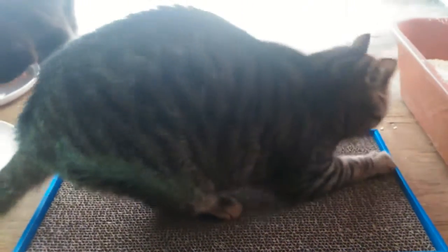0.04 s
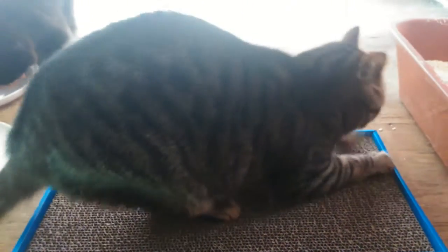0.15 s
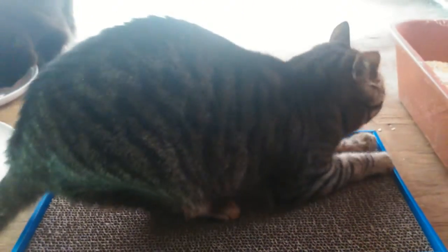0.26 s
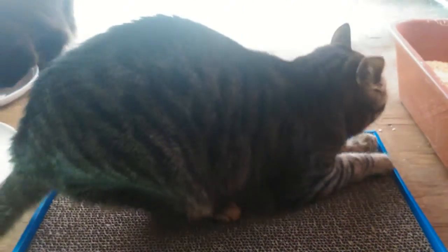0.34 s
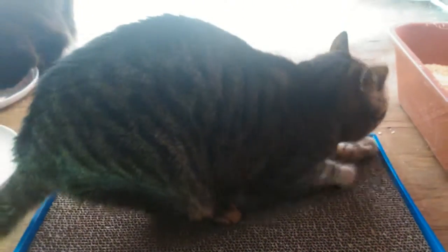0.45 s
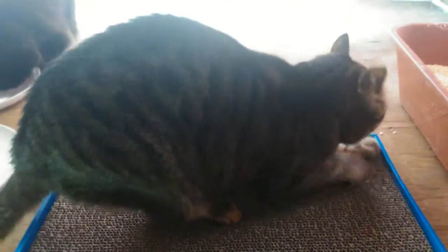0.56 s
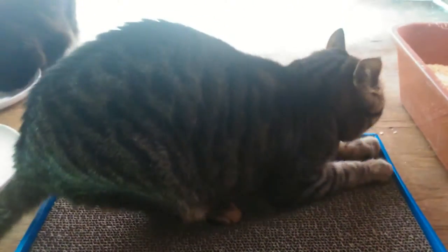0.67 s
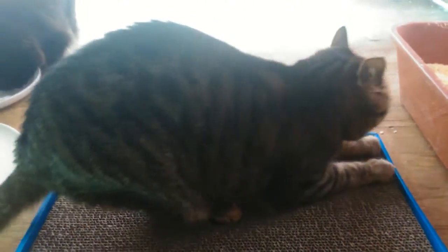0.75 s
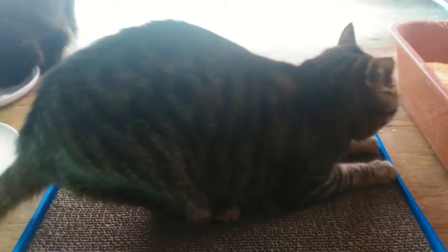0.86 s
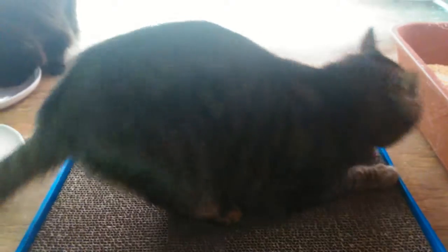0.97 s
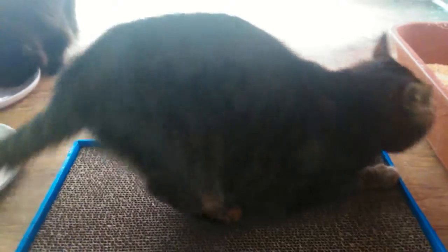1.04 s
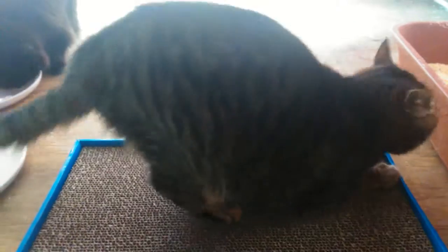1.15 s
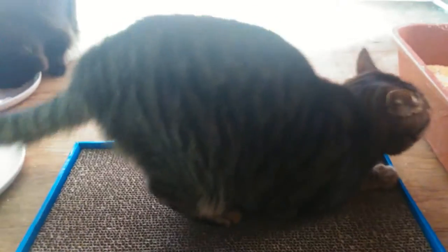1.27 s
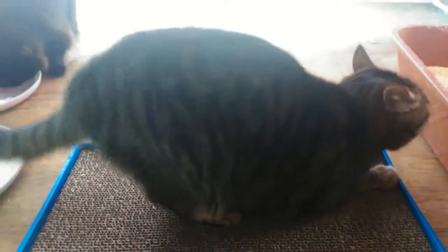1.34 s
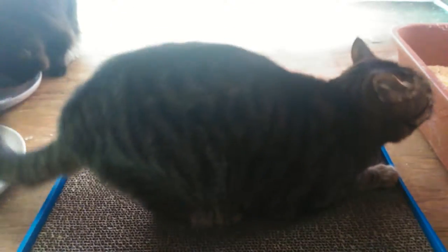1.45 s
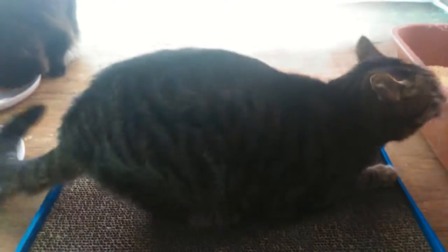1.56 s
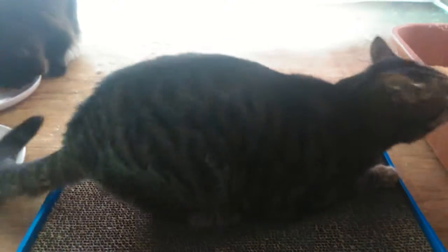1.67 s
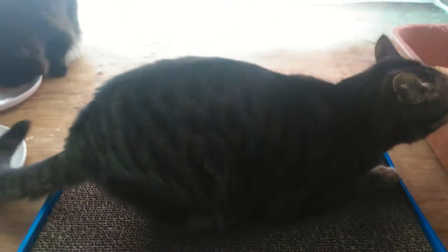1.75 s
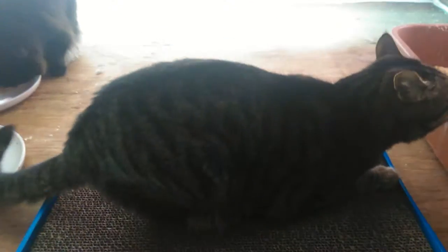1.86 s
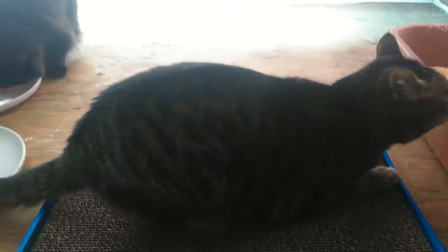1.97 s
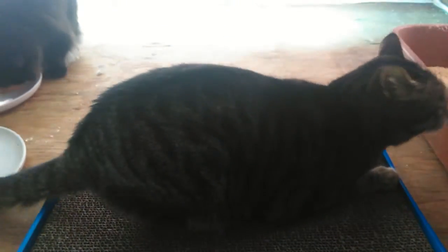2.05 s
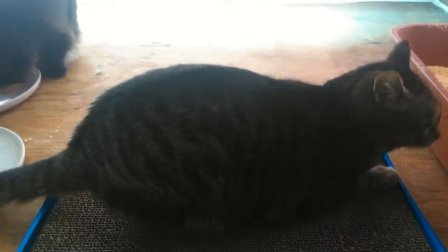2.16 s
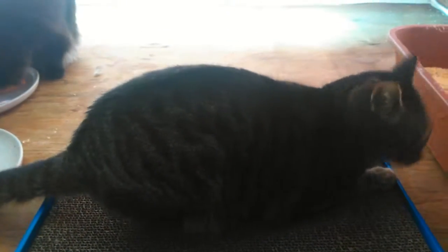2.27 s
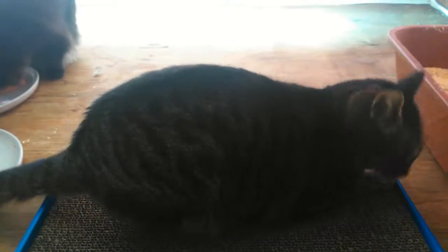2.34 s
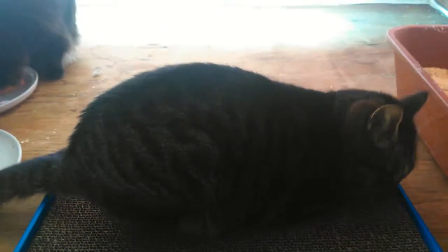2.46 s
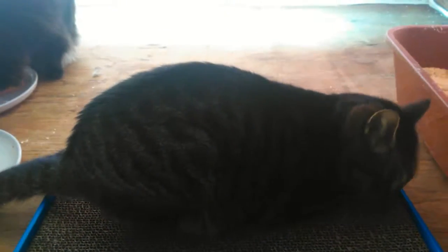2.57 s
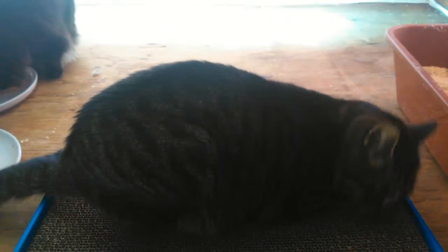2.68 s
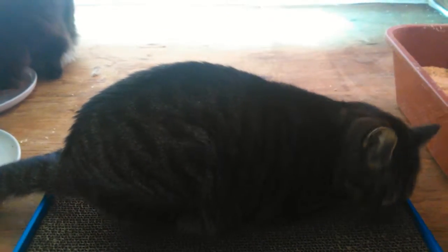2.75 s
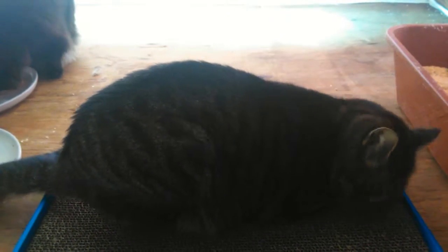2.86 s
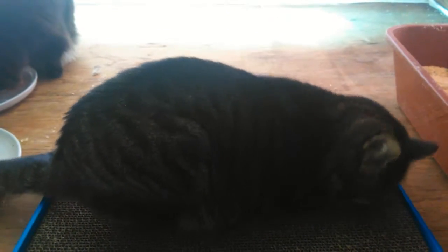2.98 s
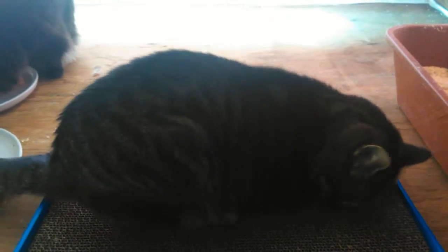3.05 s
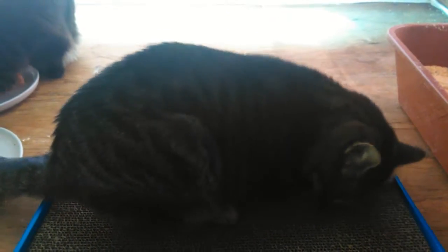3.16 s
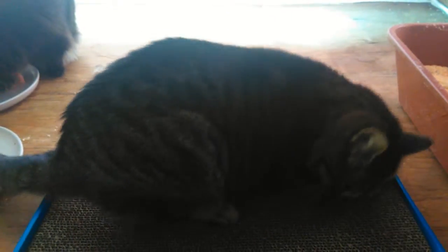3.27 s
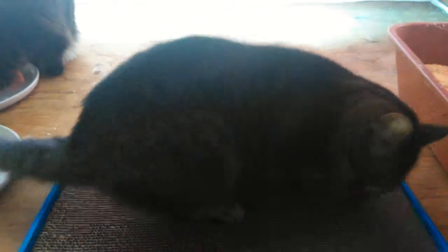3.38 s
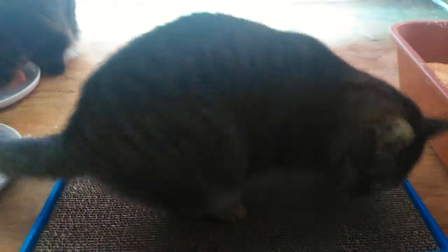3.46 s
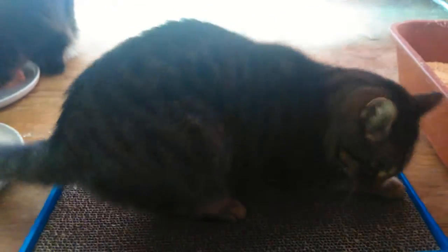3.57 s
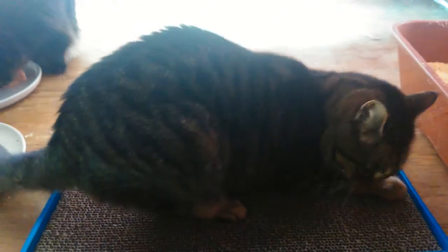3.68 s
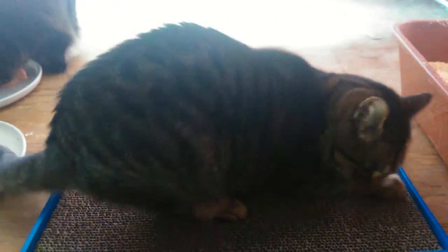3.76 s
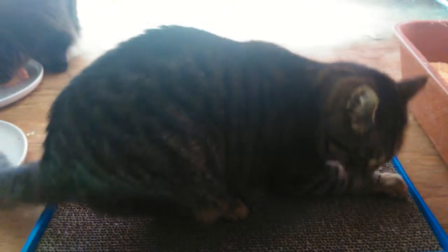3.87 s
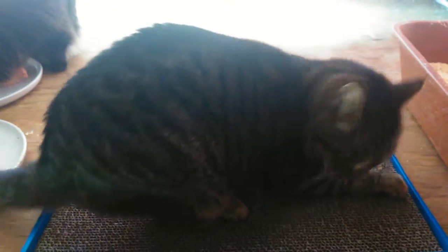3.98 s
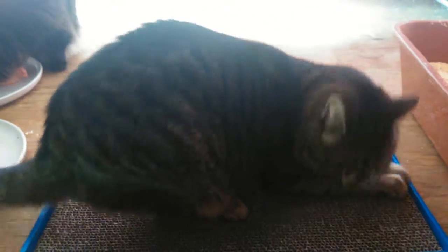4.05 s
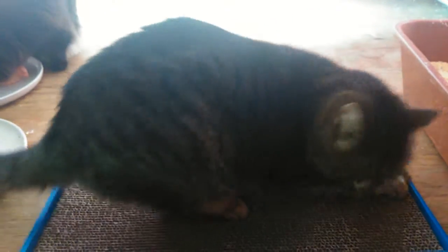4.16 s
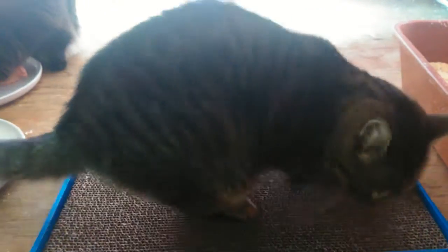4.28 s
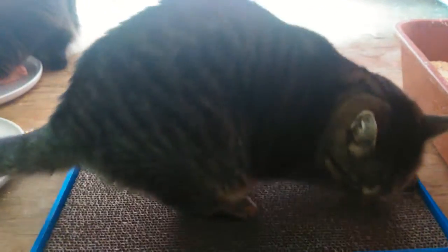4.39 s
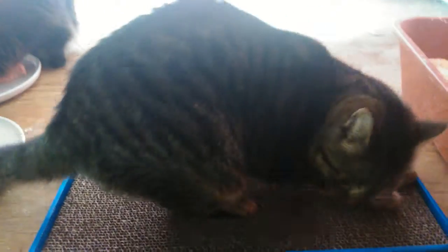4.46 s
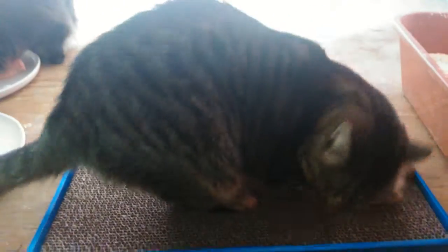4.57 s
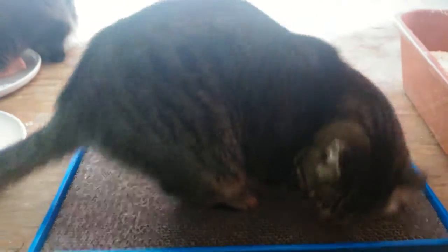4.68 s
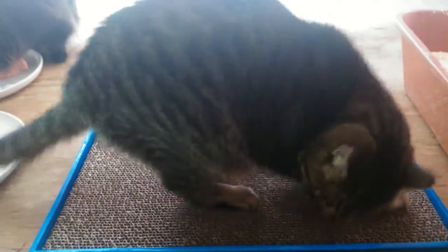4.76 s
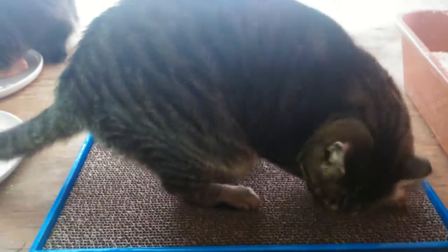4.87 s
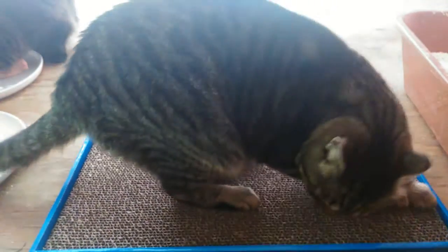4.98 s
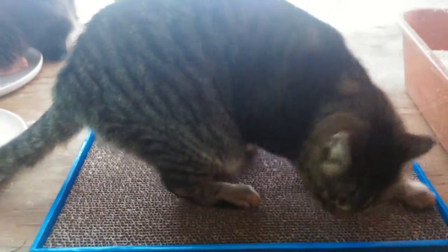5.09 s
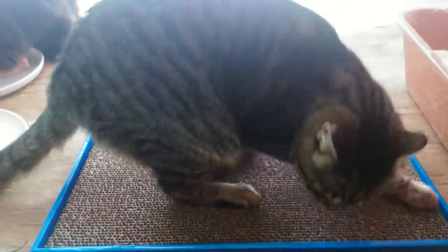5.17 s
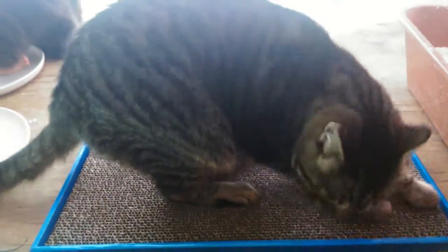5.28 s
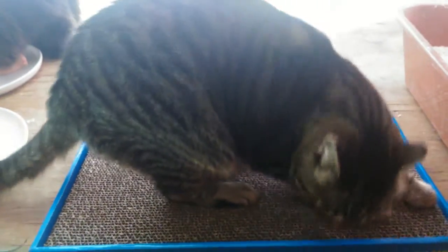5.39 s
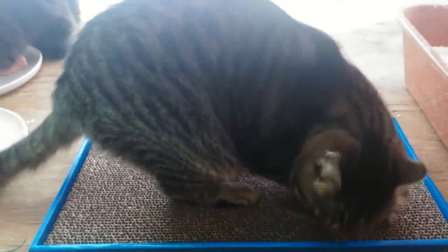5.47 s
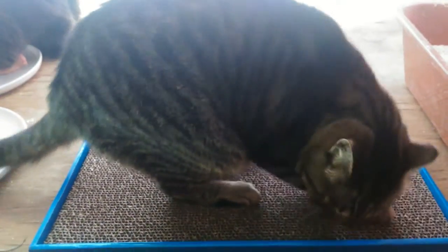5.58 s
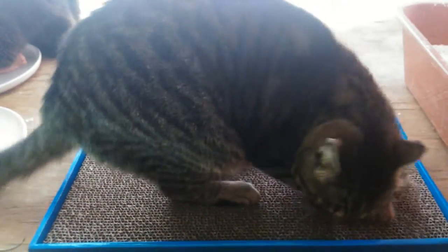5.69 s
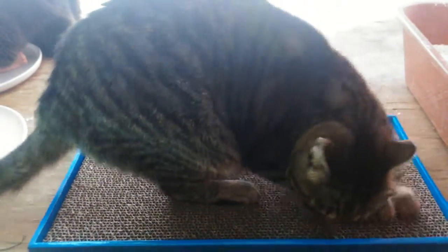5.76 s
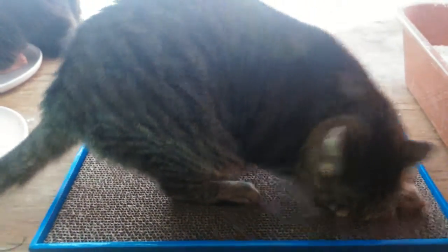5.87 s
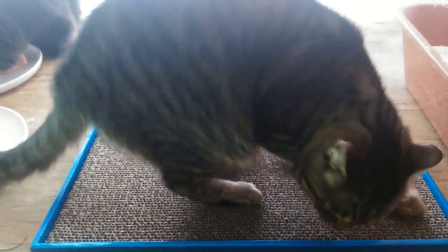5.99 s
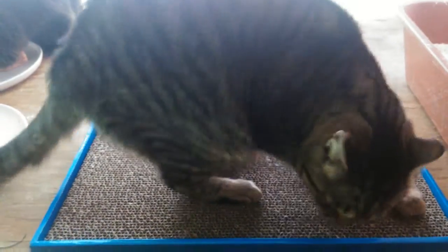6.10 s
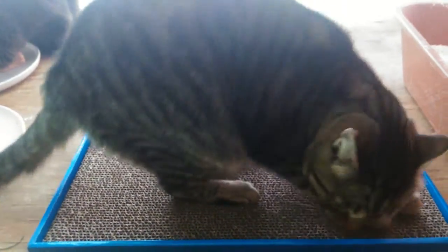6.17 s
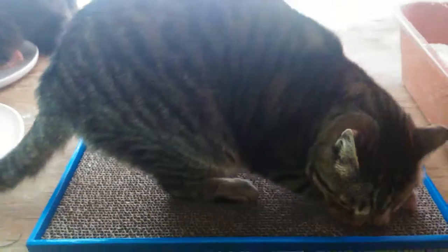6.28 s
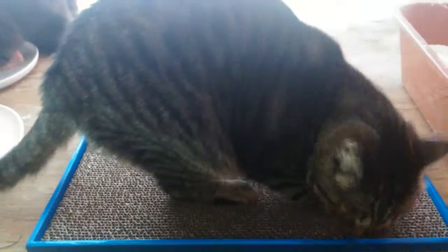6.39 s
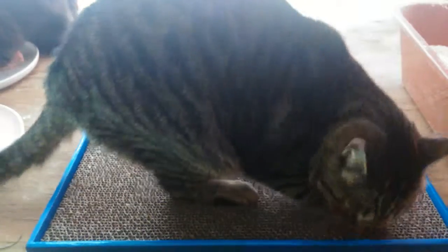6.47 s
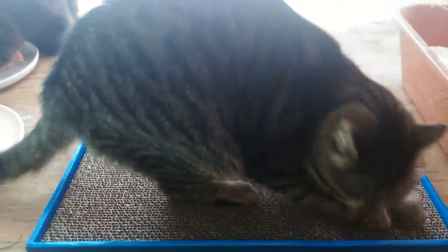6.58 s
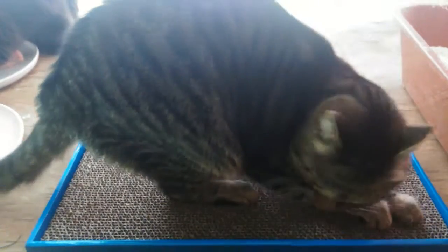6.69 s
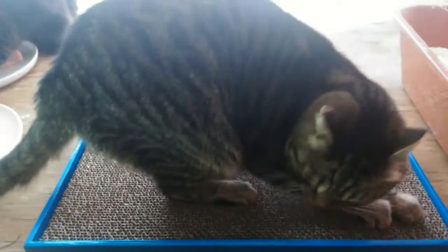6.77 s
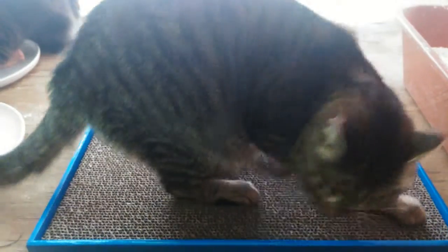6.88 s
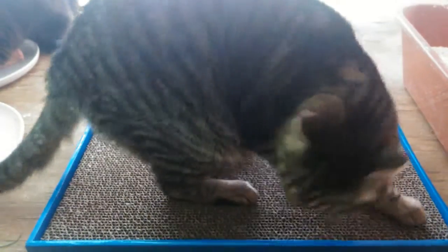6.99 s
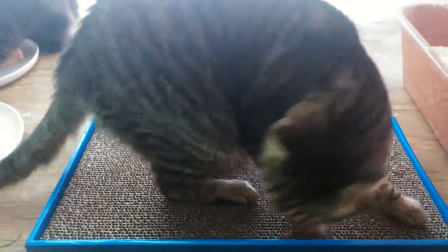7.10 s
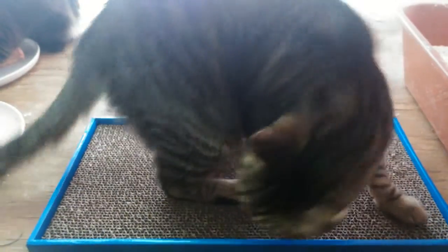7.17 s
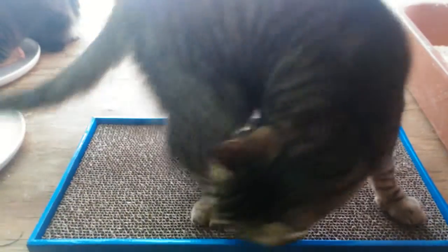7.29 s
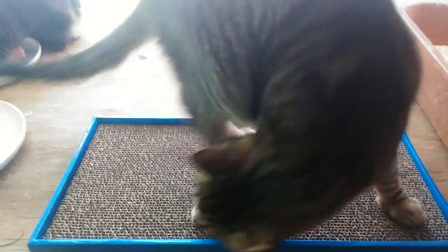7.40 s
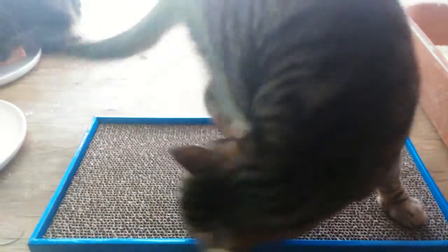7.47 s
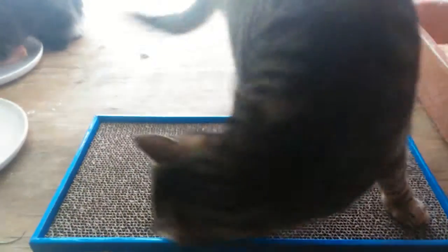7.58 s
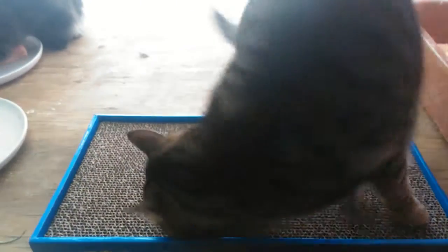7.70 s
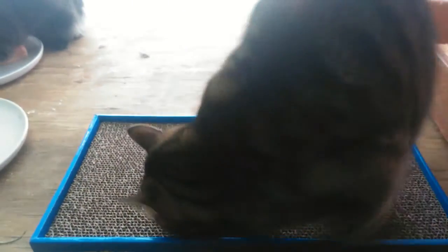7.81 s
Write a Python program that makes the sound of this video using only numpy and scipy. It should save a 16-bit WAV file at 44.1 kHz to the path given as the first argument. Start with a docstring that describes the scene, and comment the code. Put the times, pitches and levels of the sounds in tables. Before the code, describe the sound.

At 0 s a loud claw snag rips corrugated cardboard right beside the microphone, with a deep thud in the floor planks. Irregular scratches follow several times a second until about 1.25 s: crisp fibre tearing, hollow flute-like scraping, small ticks and dull pad knocks. From 1.3 to 2.9 s it is nearly silent, with soft hiss, faint purring flutters around 1.5-1.9, 2.1-2.3, 2.4-2.7 and 2.8-2.9 s, light airy sniffs from 2 s, and barely audible shifts of weight. Clawing resumes at 3 s and thickens into rapid, forceful rasps, densest at 4.2-5.2 s, with strong rips at 5.5, 6.0, 6.4 and 6.9 s. Low booms near 60-70 Hz sag under the heavy pulls. A tiny hard object buzzes at 5.2, 6.0, 6.2 and 7.25 s. Scratching thins after 7.1 s, nearly stops around 7.4, then weaker scrapes return from 7.6 to the end. The small room adds a brief, dry reflection.

```python
"""Cat clawing a cardboard pad

A cat claws corrugated cardboard on a plank floor, close to a two-port microphone in a small room.
Timed snags drive noise through the tearing fibres, claw tips, flutes and pad; sine plucks twang and tick.
Pitch-sagging sines boom in the planks under each pull; in a pause pulsed noise purrs and airy noise sniffs.
Something small and hard buzzes now and then. Decaying noise answers as the room, over microphone hiss.
"""
import sys
import numpy as np
from scipy import signal
from scipy.fft import rfft, irfft, next_fast_len
from scipy.io import wavfile
from scipy.ndimage import uniform_filter1d, map_coordinates

SR = 44100
rng = np.random.default_rng(int(sys.argv[2]) if len(sys.argv) > 2 else 0)


def generate_wav(sig):
    """Save sig (samples, or channels by samples) to the path in sys.argv[1] as 16-bit PCM at SR."""
    pcm = np.round(np.clip(np.atleast_2d(sig).T, -1, 1) * 32767).astype(np.int16)
    wavfile.write(sys.argv[1], SR, pcm)


N = 345744


def amp(db):
    """Decibels to gain."""
    return 10 ** (np.asarray(db) / 20)


def unit(x):
    """Scaled to rms 1."""
    return x / np.sqrt(np.mean(x ** 2) + 1e-20)


def along(points, hz):
    """Values between (Hz, value) points, read on a log frequency axis."""
    point_hz, values = np.transpose(points)
    return np.interp(np.log(hz + 1), np.log(point_hz + 1), values)


def curves(rows, silent=-120):
    """One value per sample for each column after the time; silence outside the rows."""
    s, *columns = np.transpose(rows)
    return [np.interp(np.arange(N) / SR, s, column, silent, silent) for column in columns]


def wobble(rate):
    """A smooth random curve, rate knots a second."""
    knots = rng.standard_normal(int(N * rate / SR) + 4)
    return map_coordinates(knots, [np.arange(N) * rate / SR])


def filtered(x, response):
    """x times a complex response of frequency."""
    m = next_fast_len(N + SR // 2)
    return irfft(rfft(x, m) * response(np.fft.rfftfreq(m, 1 / SR)), m)[..., :N]


def coloured(x, spectrum):
    """x through a (Hz, dB) spectrum scaled so that white noise keeps rms 1."""
    hz = np.linspace(0, SR / 2, 4096)
    white_rms = np.sqrt(np.mean(amp(2 * along(spectrum, hz))))
    return filtered(x, lambda f: amp(along(spectrum, f))) / white_rms


def resonant(x, modes):
    """x through causal (Hz, width Hz, dB) resonances scaled so that white noise keeps rms 1."""
    def body(f):
        return sum((-1) ** k * amp(db) * 1j * f * width / (centre ** 2 - f * f + 1j * f * width)
                   for k, (centre, width, db) in enumerate(modes))

    white_rms = np.sqrt(np.mean(np.abs(body(np.linspace(0, SR / 2, 8192))) ** 2))
    return filtered(x, body) / white_rms


def grit(rate, spread_db, smooth, apart):
    """Fibres snapping at random moments over smooth friction noise; a share differs between the ports."""
    moment, sign, size = rng.random((3, 3, N))
    snaps = (moment < rate / SR) * np.sign(sign - .5) * amp(-spread_db * np.log(size + 0.0012))
    friction = rng.standard_normal((3, N))
    shared, *ports = np.sqrt(1 - smooth) * unit(snaps) + np.sqrt(smooth) * friction
    return np.sqrt(1 - apart) * shared + np.sqrt(apart) * np.array(ports)


def patchy(x, depth_db):
    """Every spot of the pad rings a little differently: random gain patches in time and frequency."""
    z = signal.stft(x, nperseg=256)[2]
    field = uniform_filter1d(rng.standard_normal(z.shape[1:]), size=3, axis=0)
    field = uniform_filter1d(field, size=12, axis=1)
    return signal.istft(z * amp(depth_db * unit(field)), nperseg=256)[1][:, :N]


# Claws snagging and ripping free, close to the microphone; levels before each layer's own trim:
# start_s [s], tear_db [dB], scrape_db [dB], knock_db [dB], rip_t60_s [s, before stretching], flute_hz [Hz]
CLAW_SNAGS = [(0.0215, -5.5, -8, -6.5, 0.25, 1926), (0.1007, -18.5, -28.5, -32, .16, 4550),
              (0.164, -25, -23, -33, 0.2, 2150), (.2431, -24.5, -42, -24.5, 0.036, 1930),
              (0.2758, -31.5, -11.5, -22, 0.068, 2535), (0.3432, -15.5, -13, -11.5, 0.12, 1604),
              (.4568, -11, -13.5, -2, .2, 2124), (0.5142, -19, -17.5, -18, 0.41, 2110),
              (0.548, -13.5, -19.5, -24, .1, 2100), (0.5899, -14, -13, -12, .095, 2126),
              (0.6759, -25.5, -24, -26, 0.4, 2160), (.8583, -24, -28.5, -19.5, 0.32, 1977),
              (0.9284, -27.5, -32, -41, 0.27, 2044), (0.958, -23, -19, -3, 0.055, 1944),
              (0.965, -7.5, -9, -12, 0.12, 3300), (1.1013, -31.5, -80, -24, 0.19, 2533),
              (1.198, -24.5, -23, -23, 0.31, 2310), (1.2392, -12, -5.5, -18, 0.076, 1687),
              (1.664, -62, -40.5, -37, 0.15, 1840), (1.773, -51, -49, -46, .14, 2000),
              (2.6599, -47, -49, -55, .16, 2870), (3.026, -23, -21, -21.5, 0.11, 1974),
              (3.0844, -13, -18.5, -18, .11, 1894), (3.1818, -18, -16, -16.5, 0.067, 2140),
              (3.251, -20.5, -14, -22.5, .08, 2006), (3.2603, -6, -7, -9, 0.11, 1960),
              (3.326, -22, -28.5, -28.5, 0.25, 2500), (3.4079, -8, -5.5, -3, 0.28, 1834),
              (3.5127, -17, -19.5, -21, .11, 4065), (3.5678, -48.5, -32, -25, 0.12, 1715),
              (3.6179, -20, -23.5, -23.5, 0.17, 2230), (3.6328, -17.5, -11, -19, 0.13, 2100),
              (3.712, -19.5, -9.5, -8, .3, 2410), (3.7372, -9.5, -13.5, -16, 0.38, 2010),
              (3.765, -28.5, -27, -5, 0.23, 1920), (3.801, -23, -25, -15, 0.27, 2070),
              (3.9449, -19.5, -18.5, -27.5, 0.061, 5170), (4.0081, -10, -12.5, -13.5, 0.12, 4740),
              (4.086, -19.5, -14, -22, 0.14, 3980), (4.124, -15, -17, -15.5, .21, 4230),
              (4.2108, -20.5, -16.5, -20.5, .14, 1990), (4.2714, -8, -7, -4.5, 0.28, 2045),
              (4.2936, -15, -5.5, -19.5, 0.14, 3260), (4.299, -16, -8, -21.5, 0.21, 4500),
              (4.446, -6.5, -15.5, -16, 0.092, 1928), (4.5194, -9, -9.5, -11.5, .14, 4640),
              (4.5558, -6.5, -12.5, -16, .14, 4300), (4.6243, -11.5, -15, -13.5, .18, 1875),
              (4.6499, -2, -3, -13.5, .14, 4366), (4.6958, -7.5, -4, -6.5, 0.15, 1896),
              (4.7398, -4.5, -5.5, -4, 0.14, 1920), (4.855, -29, -32, -37, 0.12, 4560),
              (4.8969, -33, -22.5, -46, 0.057, 1850), (4.946, -13, -5, -20, 0.1, 2300),
              (4.947, -7.5, -13, -28, 0.057, 4500), (5.033, -21.5, -17, -26, 0.13, 2316),
              (5.0672, -15.5, -22.5, -29.5, .23, 2190), (5.0846, -14.5, -5, -5.5, 0.26, 1700),
              (5.1467, -12.5, -13, -38, 0.19, 1872), (5.2026, -13, -19, -30, .13, 2270),
              (5.2387, -11, -18, -36, 0.15, 2116), (5.45, -15.5, -14, -8.5, 0.1, 5720),
              (5.5003, -2, -3.5, -1, 0.17, 2037), (5.5487, -16, -15.5, -32, 0.17, 2190),
              (5.651, -22.5, -24.5, -31.5, 0.2, 2125), (5.719, -6.5, -9, -15.5, .14, 2056),
              (5.785, -20.5, -23, -22.5, 0.27, 2190), (5.8351, -28, -31, -51.5, 0.053, 2660),
              (5.9053, -26.5, -31.5, -33, .19, 4470), (5.921, -22, -22, -45, 0.18, 2490),
              (5.9591, -6.5, -6, -8, .15, 2690), (5.968, -5.5, -7.5, -4, .15, 2126),
              (6.009, -17, -30, -35, .05, 2200), (6.1307, -8, -10.5, -25, 0.14, 2210),
              (6.1634, -10, -11, -20.5, .13, 2164), (6.1984, -15, -17.5, -24, 0.24, 2196),
              (6.217, -18.5, -21, -30, .06, 2230), (6.2425, -15, -7.5, -12, 0.11, 2093),
              (6.3929, -31, -28.5, -22.5, 0.2, 1920), (6.4301, -7, -4, -5.5, .15, 2135),
              (6.5234, -24, -28.5, -32, .16, 2360), (6.625, -20.5, -25.5, -28, .06, 2140),
              (6.633, -7, -14, -18.5, 0.17, 2200), (6.72, -16.5, -18.5, -30, 0.14, 2055),
              (6.7513, -16.5, -21, -22, 0.21, 1750), (6.818, -18, -20, -28.5, 0.11, 5620),
              (6.8832, -4.5, -9, -4.5, 0.12, 2157), (6.9335, -19, -24.5, -45, .08, 2280),
              (7.0204, -12, -16.5, -38, 0.12, 2420), (7.0621, -14, -15, -24, .08, 2116),
              (7.0725, -9, -15.5, -21, .35, 2220), (7.2372, -14.5, -30.5, -19.5, 0.098, 2594),
              (7.271, -22, -30, -37, 0.9, 2215), (7.341, -17.5, -28, -33.5, 0.16, 2298),
              (7.57, -63.5, -32, -28.5, .2, 1990), (7.6096, -33, -34, -34, 0.4, 2550),
              (7.623, -25.5, -37, -40, .06, 4410), (7.6669, -29, -29.5, -44.5, 0.22, 2174),
              (7.7228, -23.5, -40, -25.5, .1, 2250), (7.7486, -11.5, -22.5, -17.5, 0.11, 1813),
              (7.785, -24.5, -34, -33.5, 0.046, 2200), (7.8035, -23, -29, -29, .16, 5400)]


def ripping(levels_db, pans, drag, noise, stretch, snap_db, crack_db):
    """One layer's excitation: a snap and short crack as each claw lets go, then a dying rip, over the drag."""
    rip_bend = 1.17  # over 1: a rip keeps its strength at first, then breaks off
    power, snaps = np.zeros((2, N + SR)), np.zeros((2, N))
    t = np.arange(SR // 3) / SR
    crack = amp(crack_db - 60 * t / 0.0048)
    for (s, tear_db, _, _, t60, _), db, pan in zip(CLAW_SNAGS, levels_db, pans):
        start, sides = round(s * SR), amp([[pan / 2], [-pan / 2]])
        rise_s = 0.00019 * amp(-.5 * tear_db)  # weak catches build up more slowly
        rip = amp(-60 * (t / np.clip(stretch * t60, .008, .6)) ** rip_bend)
        shape = amp(db) * (1 - np.exp(-t / rise_s)) * (crack + rip)
        power[:, start:][:, :len(t)] += (shape * sides) ** 2
        slowness = 1 + (rise_s / 0.0024) ** 2  # a slow catch hardly snaps
        snaps[:, start + 8] = amp(db + snap_db) * sides[:, 0] / slowness
    return snaps + np.sqrt(power[:, :N] + drag ** 2) * noise


SQUEAL_DB_PER_OCTAVE = 1.5  # higher-pitched catches squeal and twang harder


def octaves_up(flute_hz):
    """Octaves above the usual flute pitch."""
    return np.log2(flute_hz / 1990)


def plucks():
    """The flute that a claw lets go of twangs at its own pitch, and the claw tip ticks high above it."""
    twang_db, tick_db, scatter_db = -8, -14.5, -1.5  # twang over scrape; tick over tear; random spread
    tick_hz, tick_spread = 9310, .12  # spread of the log pitch
    out, t = np.zeros(N + SR), np.arange(SR // 10) / SR
    for s, tear_db, scrape_db, _, _, flute_hz in CLAW_SNAGS:
        wander = np.cumsum(rng.standard_normal((2, len(t))), axis=1)  # soft card never rings pure
        twang, tick, pitch = rng.standard_normal(size=3)
        high_db = SQUEAL_DB_PER_OCTAVE * octaves_up(flute_hz)
        flute_db = scrape_db + twang_db + high_db + scatter_db * twang - 60 * t / 0.047
        flute = amp(flute_db) * np.sin(2 * np.pi * flute_hz * t + 0.098 * wander[0])
        tip_hz = tick_hz * np.exp(tick_spread * pitch)
        tip_db = tear_db + tick_db + scatter_db * tick - 60 * t / 0.013
        tip = amp(tip_db) * np.sin(2 * np.pi * tip_hz * t + 0.16 * wander[1])
        out[round(s * SR):][:len(t)] += flute + tip
    return out[:N]


# Paws dragging over the pad between snags, two bouts, levels before each layer's trim:
# start_s [s], fibre_hiss_db [dB], flute_scrape_db [dB], pad_rustle_db [dB]
PAW_DRAG = [
    [(0.0, -43, -43.5, -38.5), (0.136, -49.5, -47, -35), (0.298, -49, -47.5, -35),
     (0.424, -50.5, -52.5, -42), (0.674, -51.5, -51.5, -46), (0.81, -55, -58.5, -42),
     (0.96, -51.5, -52.5, -40.5), (1.098, -57.5, -58, -52), (1.17, -55.5, -59.5, -43.5),
     (1.272, -59, -61.5, -55.5), (1.344, -57, -68, -59.5), (1.45, -65.5, -71, -60)],
    [(2.98, -64, -70, -62), (3.06, -58.5, -75, -48), (3.22, -49.5, -56, -39), (3.62, -48.5, -49.5, -39.5),
     (3.91, -47.5, -51, -39), (4.63, -49, -47, -32), (4.79, -49.5, -51.5, -42), (5.25, -40, -41, -26),
     (5.73, -44, -50, -42), (6.08, -43.5, -43, -43.5), (6.28, -47.5, -53, -40), (6.65, -44, -43.5, -31.5),
     (7.2, -48.5, -50, -45), (7.38, -54.5, -60.5, -74), (7.58, -63, -52.5, -50.5), (7.84, -49.5, -48, -32)],
]
# Spectrum of tearing fibres: frequency_hz [Hz], level_db [dB per Hz, relative]
TEAR_SPECTRUM = [(3530, -57.5), (6000, 2.5), (7580, -4.5), (9860, 6), (11200, -2.5), (14600, -3.5),
                 (16000, -18.5)]
# Claw tips squealing on the card: frequency_hz [Hz], width_hz [Hz], level_db [dB, relative]
SQUEAL_MODES = [(3010, 1120, -4.5), (4416, 525, -1.5), (5480, 640, -3.5)]
# Flutes that the claws scrape: frequency_hz [Hz], width_hz [Hz], level_db [dB, relative]
FLUTE_MODES = [(1140, 136, 4.5), (1558, 206, 4.5), (2036, 204, 1), (2314, 260, 0.5)]
# The pad's body: frequency_hz [Hz], width_hz [Hz], level_db [dB, relative]
PAD_MODES = [(156, 9.1, -9), (277.2, 56, -3.5), (363, 57, -2.5), (449.5, 76.6, 0), (598, 96, -3.5),
             (701, 209, -8), (992, 84, -21)]


def claws():
    """Snags and drags excite tearing fibres, squealing claw tips, scraped flutes and the pad's body."""
    rub_db, flutes_db, rustle_db = np.maximum(*map(curves, PAW_DRAG))
    _, tear_db, scrape_db, knock_db, _, flute_hz = np.transpose(CLAW_SNAGS)
    octaves = octaves_up(flute_hz)
    squeal_db = (tear_db + scrape_db) / 2 - 16 + SQUEAL_DB_PER_OCTAVE * octaves
    dulled_db = scrape_db - 10.5 - octaves  # higher catches shake the flutes 1 dB less per octave
    pans = -2.05 + 1.5 * rng.standard_normal(len(CLAW_SNAGS))  # left minus right, dB
    skips = amp(2 * wobble(130))  # claws skip from flute to flute
    fibres = skips * patchy(grit(1800, spread_db=3.8, smooth=0.23, apart=.6), depth_db=3.5)
    rub = amp(rub_db + 3.9 * wobble(11))
    rustle = amp(rustle_db + 2.5 * wobble(14))
    tear = ripping(tear_db - 19.5, pans, rub * amp(-4.0), fibres,
                   stretch=0.59, snap_db=-5.5, crack_db=20.5)
    squeal = ripping(squeal_db, pans, rub * amp(-4.5), fibres,
                     stretch=0.76, snap_db=10.5, crack_db=-19.5)
    scrape = ripping(dulled_db, pans, amp(flutes_db + 2.5 * wobble(18)), fibres,
                     stretch=0.67, snap_db=4, crack_db=-17.5)
    pad_grit = grit(500, spread_db=0.99, smooth=0.49, apart=0.025)
    knock = ripping(knock_db - 3.0, pans, rustle * amp(-5.0), pad_grit,
                    stretch=0.69, snap_db=16, crack_db=-39.5)
    card = coloured(tear, TEAR_SPECTRUM) + resonant(squeal, SQUEAL_MODES)
    return card + resonant(scrape, FLUTE_MODES) + resonant(knock, PAD_MODES) + plucks()


# Heavy pulls that shake the planks under the pad:
# start_s [s], boom_db [dB], thud_db [dB, before a trim], pitch_hz [Hz, once settled], shudder_s [s]
PLANK_PULLS = [(0, -7.5, -35, 60.7, .02), (0.03, -14, -22.5, 60, .038), (0.304, -26.5, -26.5, 66.7, .071),
               (0.487, -10, -39.5, 69, 0.024), (0.695, -26.5, -25, 72.5, .056),
               (.894, -18.5, -59, 67.8, .064), (0.968, -7.5, -17.5, 58, 0.058),
               (1.115, -15.5, -33, 64.2, 0.025), (1.56, -55, -51, 60, .05),
               (1.675, -39.5, -40.5, 77, 0.062), (1.72, -50, -45, 65, .05), (1.781, -57, -41.5, 72, .05),
               (1.86, -55, -49, 65.6, 0.043), (2.79, -40, -42, 57, 0.042), (2.918, -56, -58, 66, 0.035),
               (3.111, -32, -34.5, 67, 0.022), (3.269, -16, -31, 70.4, 0.04), (3.435, -7.5, -44, 70.8, .05),
               (3.727, -9, -22.5, 66.8, 0.024), (3.781, -12, -16.5, 57, 0.076),
               (4.143, -8.5, -20, 63.3, 0.028), (4.304, -7.5, -22, 59.8, 0.072),
               (4.573, -21.5, -45, 78.2, 0.061), (4.74, -6, -13.5, 60, 0.071), (5.1, -7.5, -14, 69.8, 0.06),
               (5.264, -22, -30.5, 58.5, .033), (5.536, -11, -7, 69.5, 0.045),
               (5.744, -21.5, -51, 63.8, 0.053), (5.796, -11.5, -33, 60.9, 0.014),
               (5.988, -4, -10, 63.4, 0.049), (6.22, -13.5, -20, 67.2, 0.039),
               (6.426, -8.5, -12.5, 71.7, 0.071), (6.724, -27, -34, 72.5, 0.062),
               (6.901, -5, -12.5, 71.9, 0.046), (7.098, -12, -45, 62, .045), (7.263, -21, -33, 63.4, 0.025),
               (7.593, -24, -36.5, 66, 0.075), (7.747, -23, -37, 76.5, 0.053)]
# The cat's weight shifting on the planks: start_s [s], level_db [dB]
WEIGHT_SHIFTS = [(0.0, -17), (0.24, -38), (1.05, -24), (1.33, -44), (2.38, -68), (3.1, -41.5),
                 (3.47, -25.5), (3.67, -27.5), (3.89, -35), (4.67, -27.5), (5.85, -31), (6.07, -26),
                 (6.55, -29), (7.01, -24), (7.4, -41), (7.62, -41), (7.75, -31), (7.84, -33.5)]
# Spectrum of the murmuring planks: frequency_hz [Hz], level_db [dB per Hz, relative]
PLANK_SPECTRUM = [(13, -50.5), (22, 1.5), (48, -2), (64, 1), (78, -7.5), (119, -16.5), (194, -30.5),
                  (220, -20), (290, -61), (480, -120)]


def planks():
    """Each pull thuds and shudders the floor, sagging in pitch; shifting weight keeps it murmuring."""
    # after the shudder most of the boom stops at once, the rest rings on
    let_go_t60_s, ring_t60_s, ring_db = 0.047, 0.35, -6.5
    thud_modes = [(125, 33.5, 0), (158.3, 23.0, 4.0), (232, 21, -3.5)]  # Hz, width Hz, dB
    boom, shove, t = np.zeros(N + SR), np.zeros(N + SR), np.arange(SR // 2) / SR
    for s, db, thud_db, hz, shudder_s in PLANK_PULLS:
        after = np.maximum(t - shudder_s, 0)
        fade = amp(-60 * after / let_go_t60_s) + amp(ring_db - 60 * after / ring_t60_s)
        swell = (1 - np.exp(-t / 0.0062)) ** 2 * amp(db) * fade / (1 + amp(ring_db))
        turns = hz * (t + 0.81 * 0.0078 * (1 - np.exp(-t / 0.0057)))  # starts sharp, then sags
        boom[round(s * SR):][:len(t)] += swell * np.sin(2 * np.pi * turns)
        shove[round(s * SR):][:len(t)] += (1 - np.exp(-t / 0.0052)) * amp(thud_db + 7 - 60 * t / 0.08)
    weight_db = curves(WEIGHT_SHIFTS)[0]
    push = (shove[:N] + amp(weight_db - 22.5)) * rng.standard_normal(N)
    thud = resonant(push, thud_modes)
    wavering = amp(weight_db + 2.5 * wobble(9))
    murmur = wavering * coloured(rng.standard_normal(N), PLANK_SPECTRUM)
    return (boom[:N] + thud + murmur) * amp([[.3], [-.3]])  # a touch louder on the left


# Spectrum of microphone hiss and low room murmur: frequency_hz [Hz], level_db [dB per Hz, relative]
HISS_SPECTRUM = [(15, -38), (25, 5), (76, -0.5), (175, -7), (754, -16), (1070, -20.5), (2280, -24),
                 (2690, -22.5), (3430, -26.5), (10400, -26), (16000, -19)]
# How alike the hiss is at the two ports: frequency_hz [Hz], likeness [correlation, 0 to 1]
HISS_LIKENESS = [(60, 0.47), (240, 0.029), (950, 0), (3770, -0.0), (15000, 0.001)]
# Faint steady tones: frequency_hz [Hz], level_db [dB, before a 0.5 dB lift]
STEADY_TONES = [(10541, -101), (13577, -86.5)]


def hush():
    """Microphone hiss and low room murmur, partly alike at both ports, and two faint steady tones."""
    def shares(hz):
        turn = np.arccos(np.clip(along(HISS_LIKENESS, hz), -1, 1)) / 2
        return np.array([np.cos(turn), np.sin(turn)])

    mid, side = filtered(coloured(rng.standard_normal((2, N)), HISS_SPECTRUM), shares)
    t = np.arange(N) / SR
    tones = sum(amp(db + 0.5) * np.sin(2 * np.pi * hz * t) for hz, db in STEADY_TONES)
    return amp(-52.5) * np.array([mid + side, mid - side]) + tones


# Decay of the small room: frequency_hz [Hz], t60_s [s]
ROOM_DECAY = [(200, 0.54), (2000, 0.16), (12000, 0.21)]


def room(x):
    """Noise dies at its own speed in each band; the answer is redrawn each quarter second as the cat moves."""
    block, delay = SR // 4, 150  # samples
    out = np.zeros((2, N + SR))
    for start in range(0, N, block):
        hz, t, z = signal.stft(rng.standard_normal((2, SR // 4)), SR, nperseg=256)
        decay = amp(-60 * t / along(ROOM_DECAY, hz)[:, None])
        thin_bass = (hz / (hz + 900))[:, None]
        tail = signal.istft(z * decay * thin_bass, SR, nperseg=256)[1]
        tail = tail / np.linalg.norm(tail[0])
        answer = signal.fftconvolve(x[None, start:start + block], tail, axes=1)
        out[:, start + delay:][:, :answer.shape[1]] += answer
    return out[:, :N]


# Purring breaths close by: first_pulse_s [s], full_from_s [s], full_until_s [s], end_s [s],
# rate_hz [pulses per s], level_db [dB, relative]
PURR_BREATHS = [(1.525, 1.55, 1.64, 1.92, 29, -68.5), (2.128, 2.125, 2.2, 2.27, 26.5, -57.5),
                (2.368, 2.5, 2.59, 2.71, 24.2, -59), (2.822, 2.815, 2.8, 2.93, 24.6, -54)]


def purr():
    """The larynx flutters: short puffs shake the pad's lowest modes; each breath swells, holds and fades."""
    edge_db = -13.5  # level at both ends of a breath
    pad_modes = [(295, 136, -8.0), (343, 32, -1.0), (445, 32, -0.5)]  # Hz, width Hz, dB
    t, puffs = np.arange(N) / SR, np.zeros(N)
    for s, full, until, end, rate, db in PURR_BREATHS:
        corners = [s - .5 / rate, full, until, end]
        breath_db = np.interp(t, corners, [edge_db, 0, 0, edge_db], -120, -120)
        puffs += amp(db + breath_db) * np.exp(2.5 * np.cos(2 * np.pi * rate * (t - s)))
    body = resonant(puffs * (0.6 + rng.standard_normal(N)), pad_modes)
    return filtered(body, lambda hz: 1 / (1 + (hz / 540) ** 12))


# Sniffs close by: start_s [s], level_db [dB], t60_s [s]
NOSE_SNIFFS = [(2.0, -62.5, .6), (2.2, -71, .4), (2.36, -59, .12), (2.452, -56, .2), (2.76, -60, 0.76),
               (2.92, -54, .4)]
# Spectrum of air in the nose: frequency_hz [Hz], level_db [dB per Hz, relative]
NOSE_SPECTRUM = [(5000, -31.5), (7500, -5.5), (12000, -4.5), (14500, -23.5)]


def sniffs():
    """Air hissing through the cat's nose in short pulls."""
    rise_s, flow = 0.0058, np.zeros(N)
    for s, db, t60 in NOSE_SNIFFS:
        age = np.maximum(np.arange(N) / SR - s, 0)
        flow += (1 - np.exp(-age / rise_s)) * amp(db - 60 * age / t60)
    return flow * coloured(rng.standard_normal(N), NOSE_SPECTRUM)


# Something small and hard buzzing after a pull: start_s [s], end_s [s], level_db [dB], main_hz [Hz]
BUZZES = [(5.2, 5.469, -47.5, 5440), (6.028, 6.103, -28.5, 6080), (6.186, 6.28, -38.5, 5800),
          (7.243, 7.34, -42.5, 4330)]
# Its modes, retuned together so the second meets main_hz:
# frequency_hz [Hz, before retuning], width_hz [Hz], level_db [dB, relative]
TRINKET_MODES = [(3090, 80, -10), (6080, 130, 0), (7640, 80, -16), (9480, 70, -9), (10100, 80, -2),
                 (14800, 120, -6)]


def buzz():
    """Shaken loose, a small hard object chatters unevenly in its narrow modes."""
    t, out = np.arange(N) / SR, np.zeros(N)
    for s, end, db, main_hz in BUZZES:
        shake = uniform_filter1d(1. * ((t > s) & (t < end)), size=400) * rng.standard_normal(N)
        modes = [(hz * main_hz / TRINKET_MODES[1][0], width, level) for hz, width, level in TRINKET_MODES]
        out += amp(db) * resonant(shake, modes)
    return out * amp(1.5 * wobble(60))


# Level of near sound at the two ports: frequency_hz [Hz], left_minus_right_db [dB]
PORT_BALANCE = [(60, -4.5), (110, 22), (200, 1), (380, 3), (700, 5.5), (1290, -1.5), (2380, 4.5),
                (4400, 3.5), (8120, -3), (15000, -7)]
# Phase of near sound at the two ports: frequency_hz [Hz], left_lead_rad [radians]
PORT_PHASE = [(100, -0.5), (780, 0.61), (1200, 2.18), (2000, 0.88), (3450, 1.5), (6400, -3), (8200, 1),
              (10100, -4), (12600, 0), (15500, -3)]


def scene():
    """Near sound reaches the two ports at different strengths and phases; room, planks and hush join it."""
    near = claws() + buzz() + purr() + sniffs()
    half = np.array([[.5], [-.5]])

    def port_response(hz):
        return amp(half * along(PORT_BALANCE, hz)) * np.exp(1j * half * along(PORT_PHASE, hz))

    ports = filtered(near, port_response)
    return ports + amp(-12.5) * room(near.mean(0)) + planks() + hush()


def record(dry):
    """The microphone drops the deepest bass, squeezes peaks against full scale and cuts the top treble."""
    top_hz = 15850
    heard = filtered(dry, lambda hz: 1 / np.sqrt(1 + (42 / (hz + 1)) ** 6))
    squeezed = heard / (1 + np.abs(heard) ** 4) ** (1 / 4)
    return filtered(squeezed, lambda hz: hz < top_hz)


dry = scene()
out = record(dry)
generate_wav(out)
```